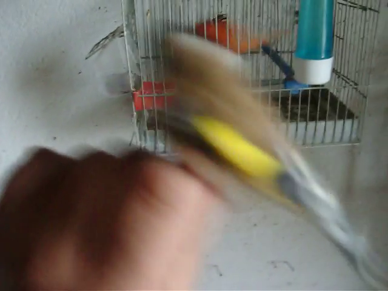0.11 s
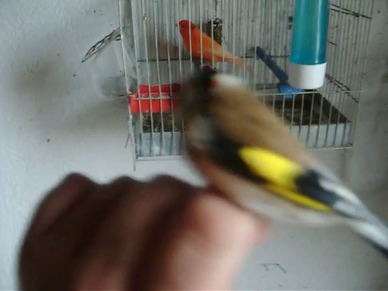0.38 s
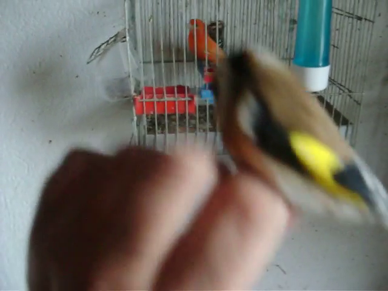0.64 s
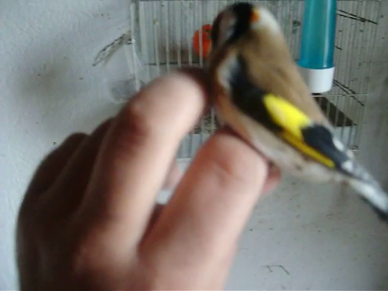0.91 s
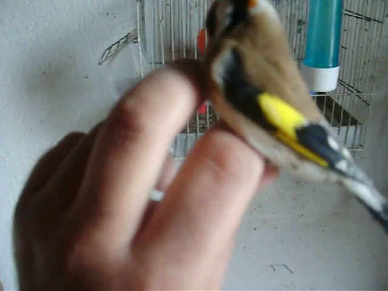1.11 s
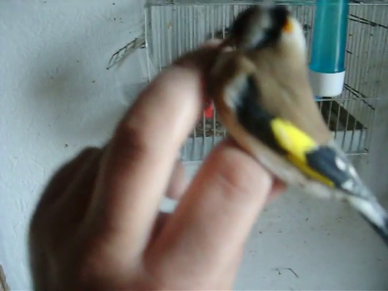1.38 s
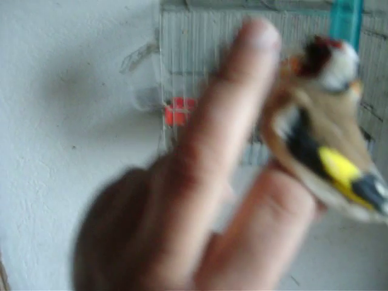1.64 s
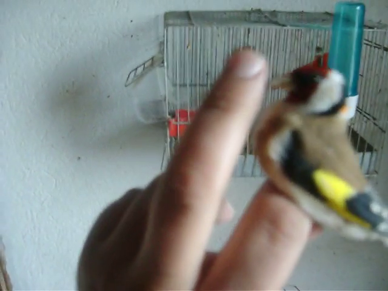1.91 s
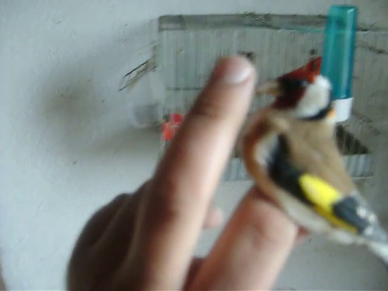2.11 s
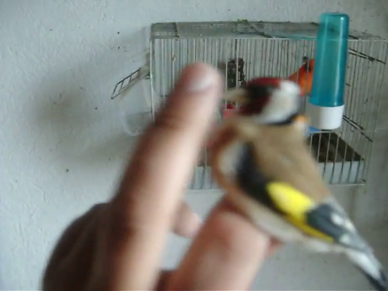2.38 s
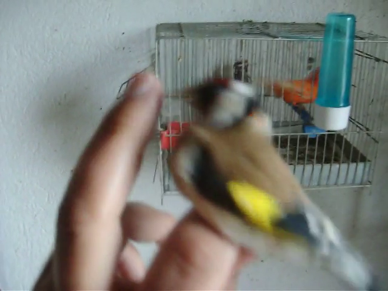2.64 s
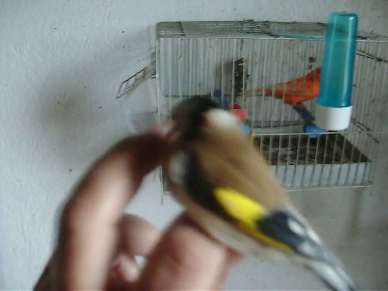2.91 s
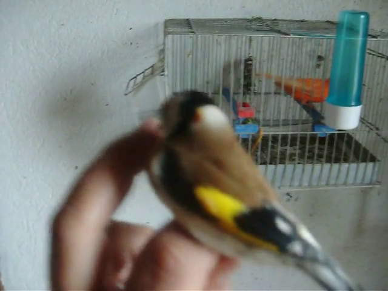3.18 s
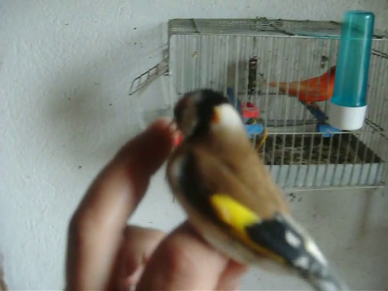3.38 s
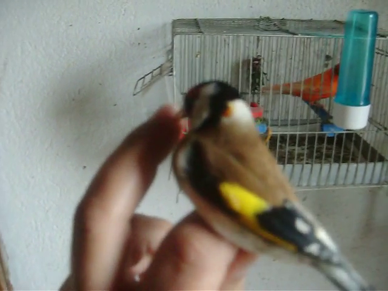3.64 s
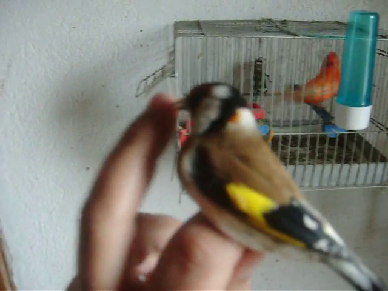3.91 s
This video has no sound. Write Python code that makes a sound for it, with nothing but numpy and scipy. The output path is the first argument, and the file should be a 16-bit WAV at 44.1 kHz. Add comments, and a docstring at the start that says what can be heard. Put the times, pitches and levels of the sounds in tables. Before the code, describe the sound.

A small finch gives five short chirping whistles in a bare room, amid dull handling knocks, ticks and a low uneven rumble.

```python
"""A small finch calls five times in a bare, hard-walled room: two gliding whistle voices with raspy air.
Dull knocks ring two modal bodies, among short handling ticks and fine crackle.
Underneath, a boomy distant traffic rumble of shaped noise swells, a motor hum comes and goes,
and a cheap camera whines faintly, adds low bumps of input overload on some loud notes,
rounds the loudest peaks and cuts the treble."""
import sys
import numpy as np
from scipy import signal
from scipy.fft import rfft, irfft
from scipy.io import wavfile
from scipy.ndimage import uniform_filter1d

SR = 44100
rng = np.random.default_rng(int(sys.argv[2]) if len(sys.argv) > 2 else 0)


def int16_out(signal):
    """Quantize to a 16-bit WAV file."""
    q = np.round(np.clip(np.atleast_2d(signal).T, -1, 1) * 32767)
    wavfile.write(sys.argv[1], SR, q.astype(np.int16))


def magnitude_from_level(level_db):
    """Linear magnitude for a level in decibels (20 dB per decade)."""
    exponent = np.asarray(level_db, float) / 20
    return 10 ** exponent


N = 255334
T = np.arange(N) / SR

# Main whistle, one sub-table per call: time_s, pitch_hz, level_db
CALLS = [
    [(0, 2560, -23), (.05, 2763, -16), (.066, 3200, -23.5), (.088, 3600, -20.5), (.115, 3290, -19),
     (.126, 3191, -24.5), (.134, 3124, -14.5), (.146, 2994, -10.5), (.156, 2990, -38)],
    [(1.126, 3600, -37), (1.136, 3750, -11.5), (1.145, 3755, -17), (1.15, 3350, -3), (1.17, 3320, -17.5),
     (1.19, 3850, -11.5), (1.208, 4100, -22), (1.236, 4050, -14.5), (1.254, 3480, -10), (1.285, 3100, -28)],
    [(2.405, 2586, -26), (2.424, 2710, -30.5), (2.43, 2528, -19.5), (2.437, 2520, -14.5),
     (2.44, 3140, -8.5), (2.454, 3200, -10), (2.474, 3430, -10.5), (2.498, 3500, -13), (2.506, 3830, -14.5),
     (2.531, 3406, -14.5), (2.545, 3150, -24), (2.558, 3100, -32.5)],
    [(3.168, 3000, -42.5), (3.177, 3100, -20.5), (3.192, 3330, -21.5), (3.206, 3284, -32),
     (3.214, 2943, -19), (3.232, 3080, -25), (3.256, 3350, -25.5), (3.272, 3280, -30), (3.286, 2873, -20.5),
     (3.3, 2850, -19.5), (3.312, 2950, -48)],
    [(4.705, 2400, -47.5), (4.728, 2620, -16.5), (4.76, 2620, -20), (4.8, 3550, -25), (4.82, 3492, -18.5),
     (4.84, 3100, -23), (4.858, 2900, -25.5), (4.885, 2900, -26.5), (4.9, 2900, -51)],
]
# Notes of the second, lower voice of the syrinx:
# start_s, length_s, from_hz, to_hz, level_db, octave_start_db
LOW_NOTES = [(0, 0.11, 2660, 2900, -26, -26.5), (1.12, 0.029, 2900, 3000, -25, -52),
             (1.249, 0.043, 2700, 3000, -20.5, -42), (2.395, .022, 2186, 2262, -39, -28),
             (2.425, 0.07, 2350, 2030, -49.5, -24.5), (2.527, 0.043, 2650, 2800, -26, -38),
             (3.167, .02, 2097, 2400, -35.5, -32), (3.188, .09, 2750, 2847, -23.5, -22.5),
             (4.691, 0.0237, 1998, 2362, -37.5, -45), (4.709, .08, 2650, 2606, -27, -33.5)]
# Air bursts where the voices set in: start_s, hold_s, level_db
RASP_BURSTS = [(0, 0.031, -27), (1.117, .015, -29), (1.258, 0.014, -31), (2.411, 0.019, -22),
               (3.183, .02, -28), (4.708, 0.022, -27.5)]
# Rasp spectrum: freq_hz, density_db_per_hz
RASP_SPECTRUM = [(1500, -14), (2200, -6), (3200, -7), (4500, -7), (5500, -3.5), (7500, -2)]
# Knocks: start_s, mid_peak_db, boom_rel_db, clack_rel_db, boom_tilt_db_per_octave
KNOCK_EVENTS = [(0.135, -19.5, 6.5, -28, 5), (0.449, -15, 3, -9.5, 8.5), (0.574, -19, 8.5, -11, -2.5),
                (0.686, -18, -6.5, -14, -1.5), (0.849, -31, 14.5, -14.5, -4), (0.963, -29, -2.5, 2, -3),
                (1.304, -10.5, -2.5, -9.5, -2.5), (1.545, -18.5, -2, -5, -8.5), (1.703, -16.5, -19, -10, 7),
                (1.818, -22.5, 3, -25, -3), (1.946, -21.5, -12, -4, 4), (2.069, -33.5, 13.5, -12.5, 14),
                (2.245, -20.5, 7, -26.5, -8), (3.66, -14.5, -4, -3.5, 7), (3.697, -10.5, -4.5, -6.5, 10),
                (3.739, -24, 3.5, 5.5, -2), (3.785, -5.5, -29, -10, -4), (3.83, -16, -27, -13, -9),
                (3.947, -21.5, 4.5, -16, -1.5), (4.319, -21.5, 3.5, -4.5, 7), (4.4, -32, 12, 12.5, -1),
                (4.448, -25, -30, 0, 1.5), (4.88, -20, 6.5, -8.5, -5), (4.899, -16.5, -3, -5.5, -12),
                (4.955, -14, -27.5, -4, -4.5), (4.996, -9, -23.5, -7.5, 2), (5.211, -12, -6, -8, 9),
                (5.252, -24, 0.5, -29, 2), (5.503, -7.5, -2.5, -17.5, -24.5),
                (5.556, -16.5, 5.5, -12, -30.5), (5.603, -16, -7, -10, 4.5), (5.645, -18.5, -3, 2.5, 9)]
# Low modes of the struck body: freq_hz, level_db, t60_s
LOW_MODES = [(220, -16, 0.067), (236.6, 0, 0.24), (274.4, 4.5, .25), (313, 0, 0.24), (422.8, -4, 0.14)]
# Middle modes of the struck body: freq_hz, level_db, t60_s
MID_MODES = [(666, -2, 0.098), (720, -9.5, 0.14), (823.8, 2, 0.083), (924.3, 0.5, 0.1), (990, 1, 0.13),
             (1050, -8.5, 0.16)]
# Clack and crackle spectrum: freq_hz, density_db_per_hz
CLACK_SPECTRUM = [(1100, -8), (1600, 4), (2500, 3), (4000, 1), (5500, 0), (7500, -2)]
# Short handling ticks: start_s, level_db, freq_hz, t60_s
TICK_EVENTS = [(.69, -32, 2050, 0.019), (.86, -29, 2030, 0.043), (1.104, -11, 1475, 0.011),
               (1.704, -23.5, 2010, 0.039), (2.2, -28, 2100, .03)]
# Distant traffic rumble levels: time_s, boom_db, rustle_db
RUMBLE_LEVELS = [(0.0, -28.5, -26.5), (0.33, -31.5, -30), (0.6, -25, -27), (0.89, -38, -35.5),
                 (1.08, -34.5, -32), (1.35, -32, -32), (2.45, -34.5, -33.5), (2.709, -44.5, -33.5),
                 (3.05, -30, -30.5), (3.3, -38, -34.5), (3.63, -36, -33), (3.84, -28, -22),
                 (3.949, -31.5, -32.5), (4.66, -37.5, -33.5), (4.82, -35.5, -28), (5.22, -32.5, -33.5),
                 (5.53, -35, -31), (5.79, -33, -23.5)]
# Rumble boom spectrum: freq_hz, density_db_per_hz
BOOM_SPECTRUM = [(120, -23), (200, -12.5), (235, -6.5), (270, -1.5), (315, 1.5), (360, -4), (450, -20.5)]
# Rumble rustle spectrum: freq_hz, density_db_per_hz
RUSTLE_SPECTRUM = [(300, -13), (500, -2.5), (650, -5), (820, 1), (1000, -2), (1200, -9.5), (1600, -12),
                   (2200, -19)]
# Hiss spectrum: freq_hz, density_db_per_hz
HISS_SPECTRUM = [(1000, 5), (1500, -17.5), (2200, -4.5), (3200, -3.5), (4500, -8.5), (6000, -7.5),
                 (7500, -10)]
# Deep bed spectrum: freq_hz, density_db_per_hz
DEEP_SPECTRUM = [(8.8, -59), (15, -27.5), (71, -9), (124, -15.5), (140, -13), (188, -18.5), (220, -6.5),
                 (290, -22), (480, -120)]
# Hum level: time_s, level_db
HUM_LEVELS = [(0, -51), (1.0, -53.5), (1.16, -41), (1.301, -53), (1.97, -38.5), (2.43, -39.5),
              (2.55, -47.5), (3.0, -49.5), (3.739, -45), (3.951, -51), (5.79, -48.5)]
# Whine tones: freq_hz, level_db
WHINE_TONES = [(3661, -47.5), (4113, -55.5)]
# Low one-sided bumps of input overload on loud notes of the second and third calls: start_s, peak_db
OVERLOAD_BUMPS = [(1.143, -13), (2.461, -25.5), (2.481, -18), (2.527, -25.5)]
# Input treble response: freq_hz, gain_db
INPUT_RESPONSE = [(1, -0.5), (4600, -1), (5500, -9), (6200, -19.5), (6800, -32), (7300, -51.5)]

OCTAVE_REL_DB, FLUTTER_DB, HALO_REL_DB = -22, 2, -5
WAVER_RATIO, LOW_WAVER_RATIO = 0.011, 0.018
LOW_EDGE_S, LOW_OCTAVE_FALL_DB_PER_S = 0.007, 219
RASP_RISE_DB_PER_S, RASP_FALL_DB_PER_S, RASP_FLICKER_DB = 797.5, 349, 4.6
AIR_REL_DB = -30.5  # sustained rasp relative to the whistle
ROOM_T60_S, NEAR_T60_S, NEAR_REL_DB, FIRST_ECHO_S = 0.38, 0.032, 7, 0.0038
FINCH_ROOM_DB, KNOCK_ROOM_DB = -4, -5
KNOCK_RISE_S, KNOCK_CONTACT_S, GRIT_DB = 0.005, 0.013, 4
CRACKLE_MIN_DB, CRACKLE_SPREAD_DB, CRACKLE_DECAY_S = -58, 10, 0.0078
HISS_DB, DEEP_DB = -43.5, -44
HUM_HZ = 145.6
BUMP_S = 0.0021
CEILING, OFFSET = 0.72, -0.0018  # fractions of full scale


def unit(x):
    """Scale to unit rms."""
    return x / np.sqrt(np.mean(x ** 2))


def colour(x, points):
    """Filter by (freq_hz, db) points; -60 dB outside them."""
    hz, db = np.transpose(points)
    log_hz = np.log(np.arange(len(x) // 2 + 1) * SR / len(x) + 1)
    gain_db = np.interp(log_hz, np.log(hz), db, left=-60, right=-60)
    return irfft(rfft(x) * magnitude_from_level(gain_db), len(x))


def noise(points):
    """Unit-rms Gaussian noise with the given spectrum."""
    return unit(colour(rng.standard_normal(N), points))


def walk(rate_hz):
    """Random levels held 1 / rate_hz and slewed twice; unit rms."""
    k = int(SR / rate_hz)
    held = rng.standard_normal(N // 64)[np.arange(N) // k]
    return unit(uniform_filter1d(uniform_filter1d(held, k), k))


def sine(hz):
    """Unit-rms sine from integrated frequency."""
    return np.sqrt(2) * np.sin(2 * np.pi * np.cumsum(hz + 0 * T) / SR)


def room(x, wet_db):
    """Direct sound plus dense reflections: near surfaces die fast, the whole room slowly."""
    t = T[:SR]
    decay = magnitude_from_level(-60 * t / ROOM_T60_S) + magnitude_from_level(NEAR_REL_DB - 60 * t / NEAR_T60_S)
    tail = rng.standard_normal(SR) * decay * (t > FIRST_ECHO_S)
    return x + magnitude_from_level(wet_db) * signal.fftconvolve(x, tail / np.linalg.norm(tail))[:N]


def finch():
    """Two syrinx voices sound together, with air rasping as they set in; all ring in the room."""
    on, hz, db = call_contours(CALLS)
    hz = hz * (1 + WAVER_RATIO * walk(300))
    whistle = on * (voice(hz, db) + voice(2 * hz, db + OCTAVE_REL_DB))
    return room(whistle + rasp(on, db) + low_voice(), FINCH_ROOM_DB)


def call_contours(calls):
    """Join calls into a soft gate, open only inside them, and full-length pitch and level."""
    s, *columns = np.transpose(np.concatenate(calls))
    on = sum(1. * (T >= call[0][0]) * (T <= call[-1][0]) for call in calls)
    return uniform_filter1d(on, size=300), *(np.interp(T, s, c) for c in columns)


def voice(hz, db):
    """A whistle whose folds beat unevenly: a noisy halo spreads around the pure line."""
    flutter = magnitude_from_level(FLUTTER_DB * walk(150))
    halo = magnitude_from_level(HALO_REL_DB) * walk(650)
    return magnitude_from_level(db) * sine(hz) * (flutter + halo)


def rasp(on, whistle_db):
    """Flickering shaped air noise: bursts at voice onsets plus a part following the whistle."""
    bursts = 0
    for s, hold_s, held_db in RASP_BURSTS:
        rise_db = RASP_RISE_DB_PER_S * (s - T).clip(0)
        fall_db = RASP_FALL_DB_PER_S * (T - s - hold_s).clip(0)
        bursts = bursts + magnitude_from_level(held_db - rise_db - fall_db)
    air = on * magnitude_from_level(whistle_db + AIR_REL_DB)
    return (bursts + air) * magnitude_from_level(RASP_FLICKER_DB * walk(200)) * noise(RASP_SPECTRUM)


def low_voice():
    """Each note glides straight with soft edges; its octave decays away from the start."""
    hz, gain, octave = np.zeros((3, N))
    for s, length_s, from_hz, to_hz, db, octave_db in LOW_NOTES:
        t = T - s
        edge = np.clip(np.minimum(t, length_s - t) / LOW_EDGE_S, 0, 1) ** 2
        # overlapping notes add their frequencies
        hz += (edge > 0) * (from_hz + (to_hz - from_hz) * t / length_s)
        gain += edge * magnitude_from_level(db)
        octave += edge * magnitude_from_level(octave_db - LOW_OCTAVE_FALL_DB_PER_S * np.abs(t))
    hz = hz * (1 + LOW_WAVER_RATIO * walk(300))
    return gain * voice(hz, 0) + octave * voice(2 * hz, 0)


def ring(modes):
    """Response of a struck body: decaying sines."""
    t = T[:SR // 4]
    return sum(magnitude_from_level(db - 60 * t / t60_s) * np.sin(2 * np.pi * hz * t) for hz, db, t60_s in modes)


def knocks():
    """A ragged push rings a low and a middle body and clacks on top; ticks ring one mode each."""
    t = T[:SR // 8]
    out = np.zeros(N + SR)
    mid = ring(MID_MODES)
    fade = np.exp(-t / KNOCK_CONTACT_S) * (1 - np.exp(-t / KNOCK_RISE_S))
    for s, db, boom_db, clack_db, tilt_db in KNOCK_EVENTS:
        rag = rng.standard_normal(len(t))
        low = ring([(hz, mode_db + tilt_db * np.log2(hz / LOW_MODES[0][0]), t60_s)
                    for hz, mode_db, t60_s in LOW_MODES])
        # loud samples stand out further: separate crackles instead of smooth hiss
        gritty = rag * magnitude_from_level(GRIT_DB * np.abs(rag))
        # a soft contact carries little treble into the bodies
        push = uniform_filter1d(rag, size=16) * fade
        parts = ((signal.fftconvolve(push, mid), 0),
                 (signal.fftconvolve(push, low), boom_db),
                 (fade * colour(gritty, CLACK_SPECTRUM), clack_db))
        for part, part_db in parts:
            out[int(s * SR):][:len(part)] += magnitude_from_level(db + part_db) * part / np.abs(part).max()
    for s, db, hz, t60_s in TICK_EVENTS:
        out[int(s * SR):][:SR // 4] += ring([(hz, db, t60_s)])
    # the bodies are too small to radiate deep bass
    highpass = signal.butter(4, 190, "high", fs=SR, output="sos")
    return room(signal.sosfilt(highpass, out[:N]), KNOCK_ROOM_DB)


def crackle():
    """Small scattered scratches of claws and husks, a dozen a second: decaying noise bursts."""
    when, size = rng.random((70, 2)).T
    bursts = np.zeros(N)
    bursts[(when * N).astype(int)] = magnitude_from_level(CRACKLE_MIN_DB + CRACKLE_SPREAD_DB * size)
    decay = np.exp(-T[:SR // 20] / CRACKLE_DECAY_S)
    return signal.fftconvolve(bursts, decay)[:N] * noise(CLACK_SPECTRUM)


def rumble():
    """Boom and rustle noise swell separately over hiss and a deep bed; all four levels flicker."""
    s, *columns = np.transpose(RUMBLE_LEVELS)
    boom_db, rustle_db = (np.interp(T, s, c) for c in columns)
    boom = magnitude_from_level(boom_db + 4.26 * walk(9.1)) * noise(BOOM_SPECTRUM)
    rustle = magnitude_from_level(rustle_db + 1.43 * walk(12)) * noise(RUSTLE_SPECTRUM)
    hiss = magnitude_from_level(HISS_DB + 1.0 * walk(13)) * noise(HISS_SPECTRUM)
    deep = magnitude_from_level(DEEP_DB + 1.6 * walk(6.6)) * noise(DEEP_SPECTRUM)
    return boom + rustle + hiss + deep


def hum():
    """A low motor tone that swells and fades, its pitch drifting slightly."""
    s, db = np.transpose(HUM_LEVELS)
    return magnitude_from_level(np.interp(T, s, db)) * sine(HUM_HZ * (1 + 0.005 * walk(3.7)))


def whine():
    """Thin tones of the camera's electronics, wavering slightly in level and pitch."""
    return sum(magnitude_from_level(db + 2.0 * walk(30)) * sine(hz * (1 + 0.0011 * walk(40))) for hz, db in WHINE_TONES)


def overload_bumps():
    """Input overload on loud notes, as low one-sided Gaussian bumps at listed times."""
    return sum(magnitude_from_level(db) * np.exp(-((T - s - BUMP_S) / BUMP_S) ** 2) for s, db in OVERLOAD_BUMPS)


def scene():
    """Sum all layers into one channel."""
    return (finch() + knocks() + crackle() + rumble() + hum() + whine() + overload_bumps())[None]


def low_pass(x):
    """Removes everything above the highest recorded frequency."""
    return signal.sosfilt(signal.butter(12, 7090, fs=SR, output="sos"), x)


def record(dry):
    """The input stage rounds loud peaks and sits slightly off zero; the treble rolls off steeply."""
    squashed = dry[0] / (1 + (dry[0] / CEILING) ** 4) ** (1 / 4)
    # mirrored ends avoid wrap-around in the filter
    padded = np.pad(squashed, SR // 10, "reflect")
    rolled = colour(padded, INPUT_RESPONSE)[SR // 10:][:N]
    return low_pass(rolled[None] + OFFSET)


dry = scene()
out = record(dry)
int16_out(out)
```